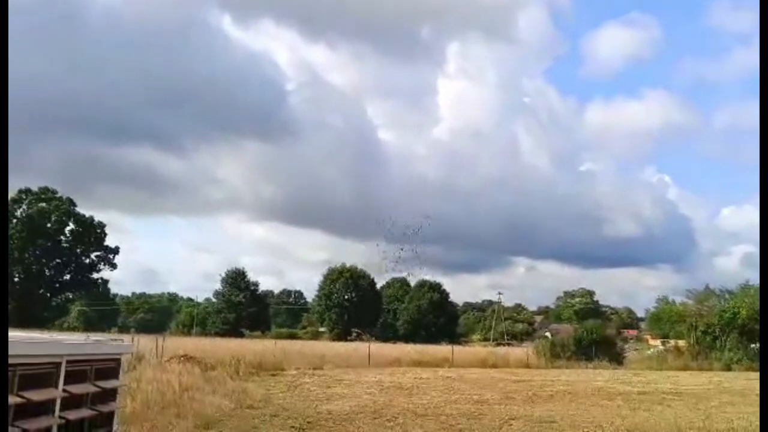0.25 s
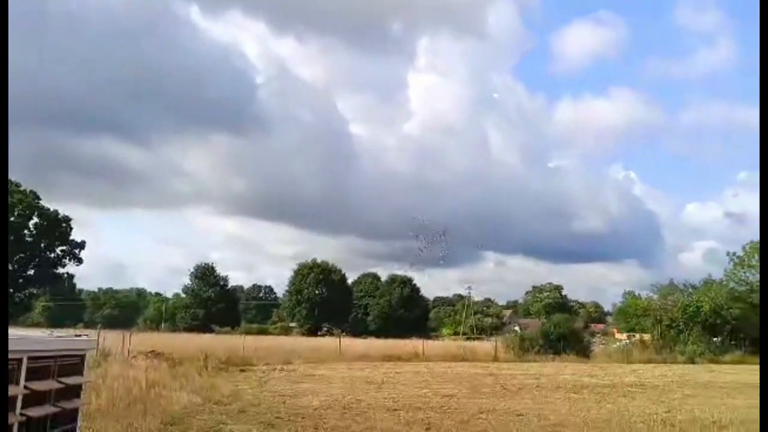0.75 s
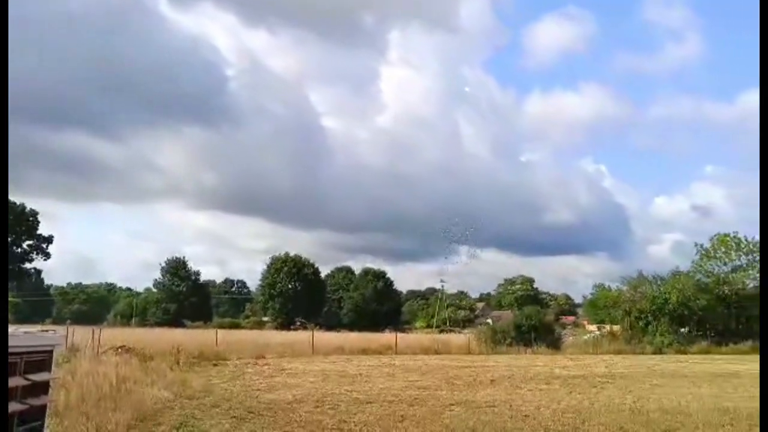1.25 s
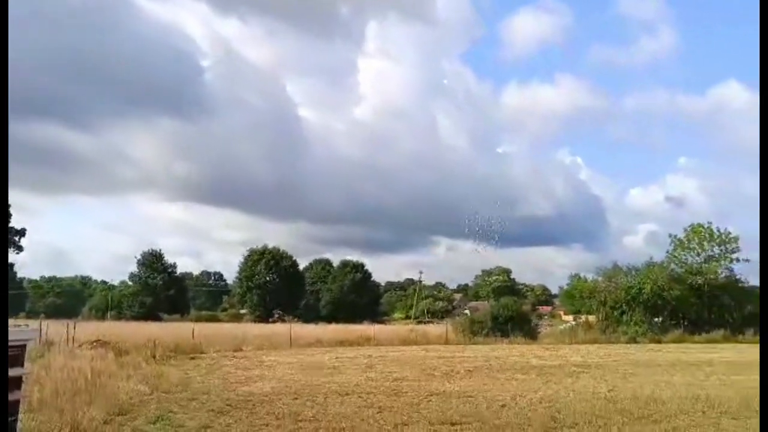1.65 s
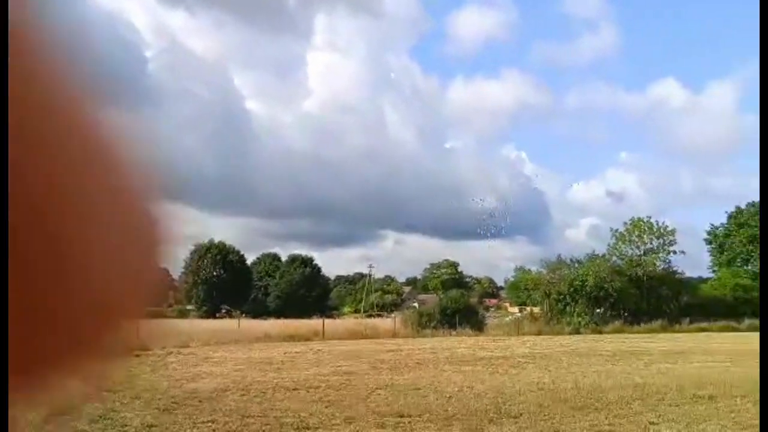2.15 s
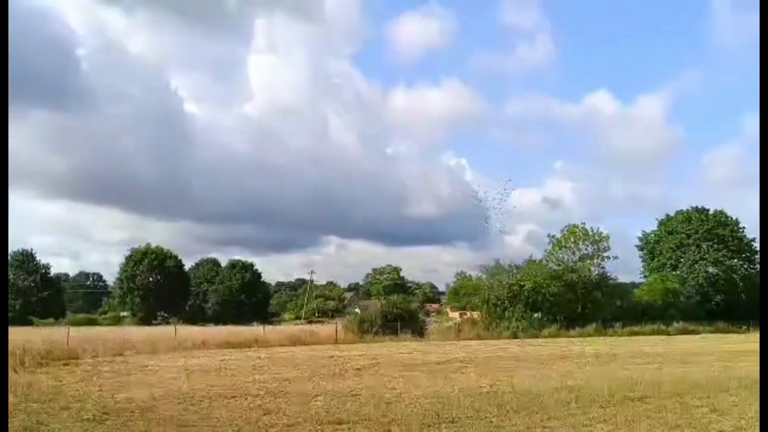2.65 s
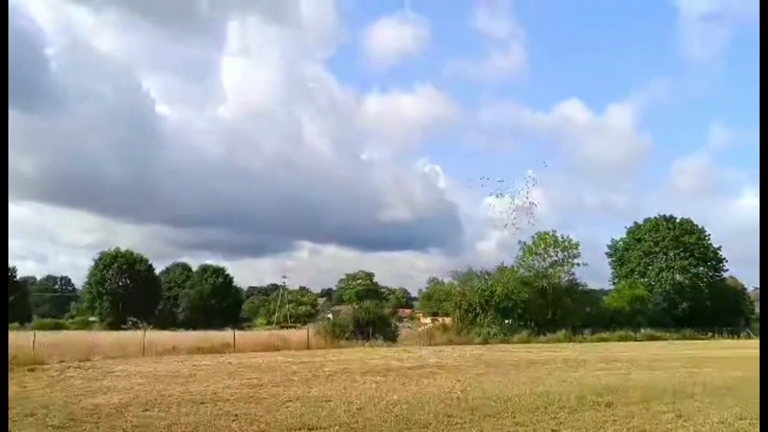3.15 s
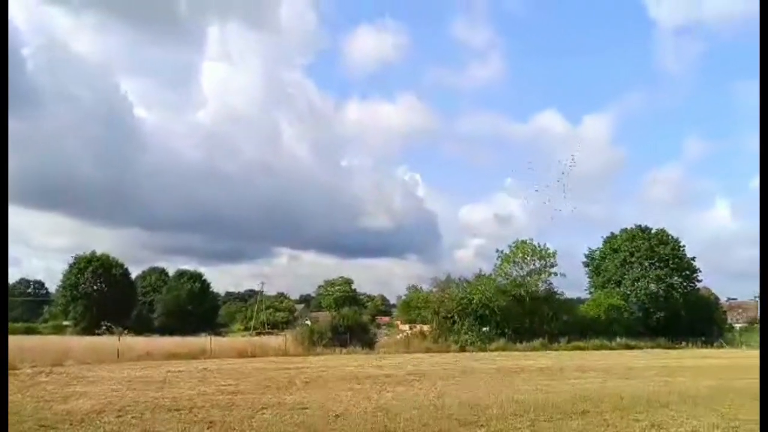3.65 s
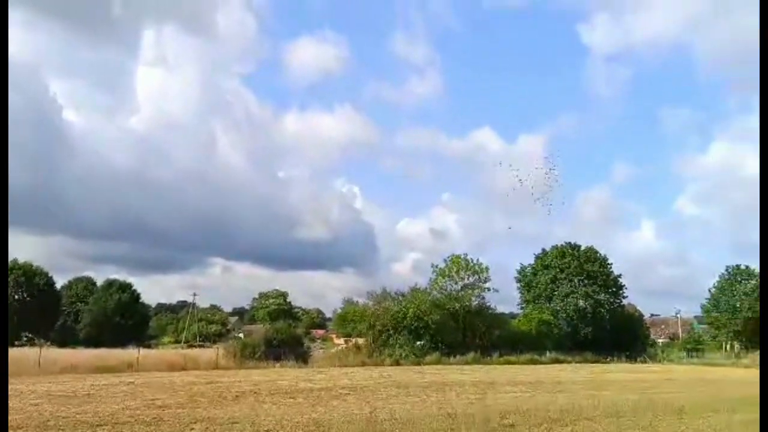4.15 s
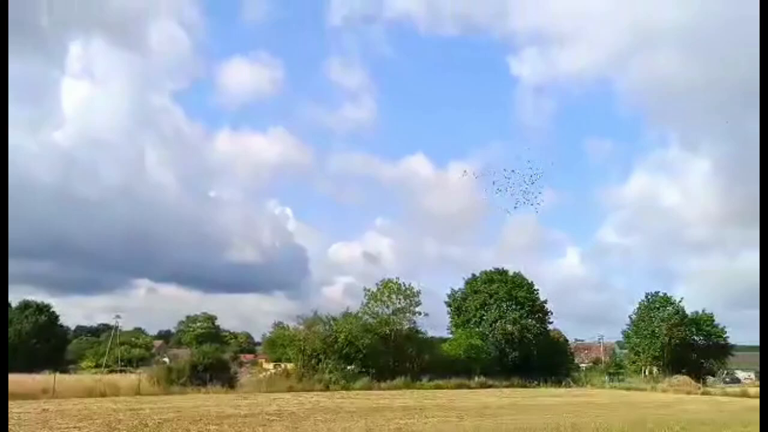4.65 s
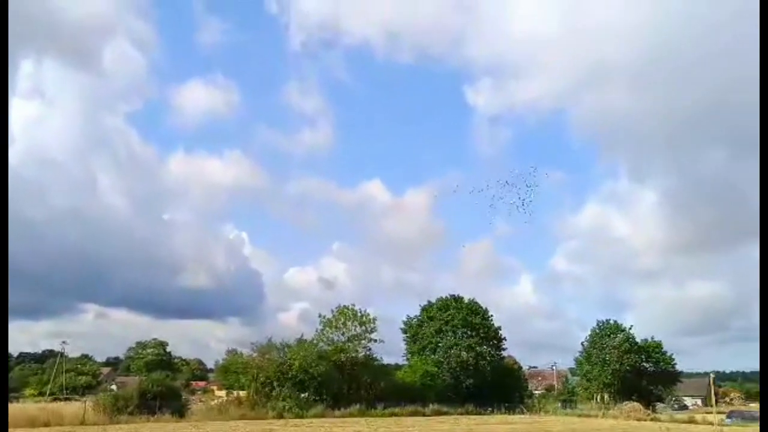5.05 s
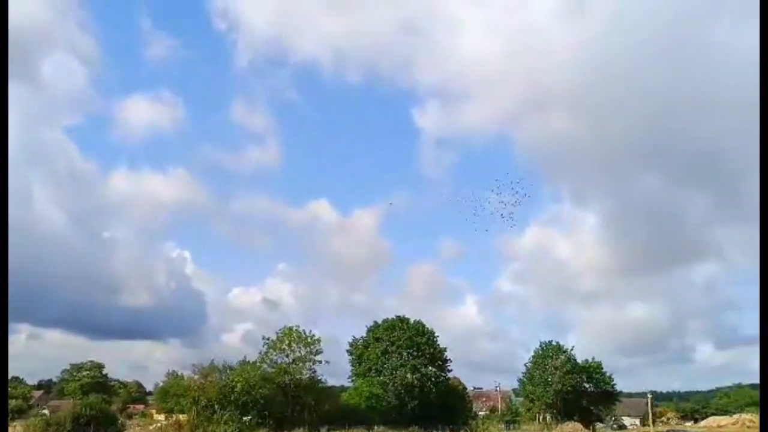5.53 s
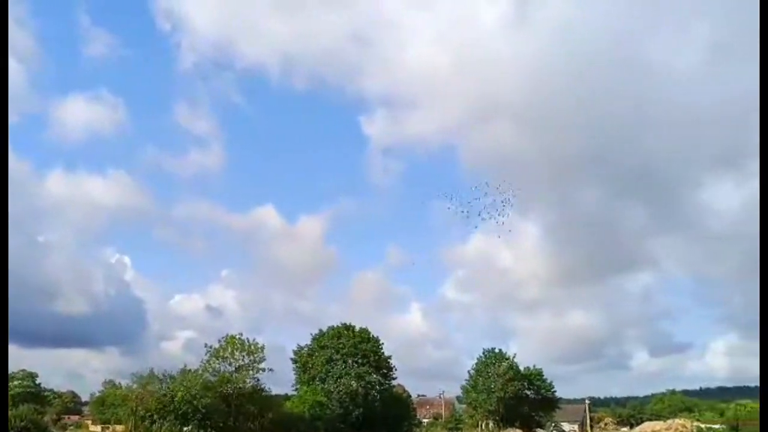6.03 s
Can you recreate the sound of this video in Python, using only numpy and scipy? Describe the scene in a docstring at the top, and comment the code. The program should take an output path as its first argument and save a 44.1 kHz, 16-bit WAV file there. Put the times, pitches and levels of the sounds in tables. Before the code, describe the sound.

Over the soft rustle of an open field, a nearby wooden crate is knocked shut, its slats rattling and a metal latch clinking. More thumps and sharp clicks follow while small birds cheep and whistle on the left. Near the end a pigeon struggles up and flaps away with crackling feathers and quick whooshes, as gusts of wind rumble and thud against the hand-held microphone.

```python
"""A wooden crate is knocked shut over the soft rustle of an open field. More knocks follow: panels
thump and ring, loose slats chatter, a latch clinks and fingers click. Small birds cheep and whistle
on the left. Near the end a pigeon struggles up and flaps off, pushing air through its feathers,
while gusts of wind rumble and thud against the two openings (ports) of a hand-held microphone."""
import sys
import numpy as np
from scipy import signal
from scipy.fft import rfft, irfft
from scipy.io import wavfile
from scipy.ndimage import uniform_filter1d

SR = 44100
rng = np.random.default_rng(int(sys.argv[2]) if len(sys.argv) > 2 else 0)


def generate_wav(signal):
    """Clip the signal to [-1, 1] and save it as 16-bit WAV at the path in sys.argv[1]."""
    frames = np.transpose(np.atleast_2d(signal))
    scaled = np.clip(frames, -1, 1) * 32767
    pcm = np.round(scaled).astype(np.int16)
    wavfile.write(sys.argv[1], SR, pcm)


N = 277389

# In the tables, pan is left minus right, and t60 is the time a sound takes to fade by 60 dB.
# how loud the leaves, grass and far bustle are: t/s, level/dB
FIELD_LEVELS = [(0.0, -53), (0.12, -49), (0.26, -48.5), (0.9, -57), (1.678, -54), (2.57, -54.5),
                (2.73, -57.5), (3.1, -49.5), (4.15, -57), (4.8, -52.5), (5.3, -49), (6.29, -51.5)]
# their tone colour: f/Hz, level/dB
FIELD_SPECTRUM = [(40, 10.5), (90, -2.5), (200, 3.5), (430, -2.5), (750, -3.5), (1250, -10), (1700, -5),
                  (2300, -10), (2900, -15), (4000, -13), (5500, -21.5), (8500, -21), (10500, -29),
                  (13500, -38.5)]
# how alike they sound on the left and right: f/Hz, likeness/0-1
FIELD_LIKENESS = [(100, 0.8), (400, 0.91), (1000, 0.4), (3000, 0.021), (8000, 0.13)]
# thin falling calls of far birds: t/s, length/s, first f/Hz, last f/Hz, level/dB,
# place of the loudest point/0-1, trill depth/0-1
CHEEP_NOTES = [(1.471, 0.17, 4640, 4270, -76.5, 0.3, .3), (1.769, 0.088, 4450, 3774, -64.5, 0.63, .05),
               (2.04, 0.19, 4550, 3910, -73, .4, 0.2), (3.585, 0.078, 4400, 3930, -71, 0.28, 0.27),
               (3.701, 0.19, 4560, 4270, -75.5, 0.6, .3), (3.986, 0.084, 4500, 3804, -69, 0.84, .05),
               (6.231, 0.052, 4060, 3700, -67, 0.48, .05)]
# hoarse rising squeaks: same columns as the cheeps
SQUEAK_NOTES = [(4.003, .06, 3130, 3250, -64, .3, .9), (4.97, 0.085, 2100, 2400, -59, 0.3, .05)]
# one bird's whistles, a list for each note: t/s, f/Hz, level/dB
WHISTLE_NOTES = [
    [(2.044, 2620, -61), (2.06, 2840, -57), (2.07, 2887, -51.5), (2.098, 2954, -48), (2.112, 2856, -67),
     (2.124, 2952, -46.5), (2.172, 3000, -67), (2.19, 2823, -77)],
    [(2.205, 2940, -75), (2.211, 2841, -68), (2.241, 2895, -50), (2.251, 2800, -52), (2.313, 2910, -66),
     (2.322, 2801, -77)],
    [(2.33, 2800, -72), (2.338, 2860, -48), (2.346, 2810, -41), (2.364, 2934, -49), (2.374, 2865, -36),
     (2.382, 2880, -53), (2.392, 2906, -36.5), (2.424, 2840, -60), (2.43, 2810, -53), (2.455, 2837, -59)],
    [(2.459, 2760, -65), (2.469, 2920, -48.5), (2.487, 2910, -44), (2.509, 2970, -53), (2.519, 2964, -44),
     (2.533, 2880, -49), (2.559, 2980, -48), (2.571, 2920, -66), (2.6, 2820, -67)],
    [(2.607, 2950, -52), (2.617, 2920, -53), (2.633, 2894, -46), (2.659, 2947, -50), (2.671, 2867, -40),
     (2.685, 2905, -54), (2.699, 2880, -45.5), (2.721, 2960, -63), (2.73, 3026, -72)],
    [(2.736, 2900, -65), (2.742, 2940, -54), (2.77, 2930, -60), (2.786, 2940, -50.5), (2.802, 2950, -61),
     (2.872, 2865, -65)],
    [(2.877, 2860, -66), (2.889, 2880, -54), (2.901, 2880, -63), (2.927, 2894, -46), (2.956, 2860, -53)],
]
# another bird's quick upward flicks, a list for each note: t/s, f/Hz, level/dB
FLICK_NOTES = [
    [(3.972, 2700, -83), (3.98, 2500, -58), (3.988, 2670, -45), (4.006, 2790, -67), (4.016, 2718, -57),
     (4.03, 2780, -72)],
    [(4.962, 1960, -60), (4.976, 2175, -51), (5.022, 2350, -53), (5.056, 2376, -54), (5.102, 2270, -67),
     (5.128, 2325, -62), (5.16, 2306, -64), (5.17, 2197, -71)],
]
# sharp snaps of a fingernail or catch: t/s, level/dB, pan/dB, f/Hz, t60/s
NAIL_SNAPS = [(1.789, -28.5, -17, 5530, .0012), (1.8374, -30.5, -16, 4420, 0.0031),
              (1.8704, -16, -28, 1860, 0.0022)]
# dry ticks of fingers, latches and wing tips: t/s, level/dB, pan/dB, treble against mids/dB, t60/s
DRY_TICKS = [(0.091, -35, -2, 13, .02), (0.164, -33, -3, -9, .03), (0.2, -43, -5, -5, .03),
             (0.5775, -41, -4, -3, .015), (0.806, -43, 0, 4, 0.034), (1.148, -45.5, 28, -7, 0.0066),
             (1.665, -38.5, -2, -0.5, 0.039), (1.815, -42, -6, -20, 0.096), (1.835, -41, 9, 19, 0.011),
             (2.122, -51, 5, -14, 0.0091), (2.63, -25, 7, -6, .015), (2.777, -45, 7, -14, .015),
             (2.961, -28.5, 4, -15, 0.023), (3.56, -40, 22, -6, 0.0082), (4.3729, -46.5, 20, -9, 0.018),
             (4.5506, -28, 5, 1, 0.028), (5.0127, -36, -2, -2, 0.023), (5.0513, -28, 25, 35, 0.0057),
             (5.058, -37, -13, 28, .008), (5.109, -39, 3, 19, 0.017), (5.2233, -29, 7, 10.5, 0.017),
             (5.232, -36.5, 4.5, 3, 0.044), (5.314, -43, 18, -10, .012), (5.37, -54, 5, 4, .012),
             (5.391, -45, -2, 14, .012), (5.427, -32, 8, 3, 0.012), (5.4803, -39, 18, -5, 0.015),
             (5.518, -51, 9, -14, .018), (5.527, -53, -8, -8, .016), (5.539, -40, 8, 13, 0.012),
             (5.593, -41, 18, -4, 0.022), (5.612, -47, -5, 1, .015), (5.631, -41, 0, 7, .012),
             (5.649, -40, 13, 10, 0.02), (5.698, -36.5, 0, 4, 0.018), (5.745, -37.5, 3, -1, 0.016),
             (5.761, -38, 11, 3, 0.015), (5.8118, -40, 21, 0, 0.011), (5.844, -45, 0, 4, .012),
             (5.855, -31, 18, -5, 0.018), (5.8736, -36, 4, 11, 0.02), (5.924, -48, 5, -3, .012),
             (5.949, -40, -3, -3, 0.017), (5.96, -39, 10, -4, .015), (5.975, -34, 3, -4, 0.017),
             (6.0405, -40, 4, -2, .012), (6.062, -42, 8, -4, 0.016), (6.088, -39, 3, -4, 0.016),
             (6.157, -52, 0, -5, .012), (6.193, -36, 4, -9, 0.017)]
# blows on the crates: t/s, rattle level/dB, thump level/dB, thump f/Hz, thump t60/s, treble/dB,
# rattle t60/s, crack against rattle/dB, share of ringing/0-1, panel pitch/ratio
CRATE_KNOCKS = [(0.093, -28.5, -39, 178.7, 0.24, -11, 0.14, 8, 0.79, 1.7),
                (.165, -38.5, -36, 207, 0.025, -25.5, 0.12, 7.5, 0.47, 0.94),
                (.182, -37.5, -28, 170, 0.036, -26, 0.35, -4, 0.7, 0.875),
                (1.173, -50, -33.5, 306, 0.02, -19, 0.7, -15, 0.85, 0.95),
                (1.458, -28.5, -21, 224, 0.035, -25.5, 0.051, -7, 0.59, 0.93),
                (1.659, -42, -25.5, 221.5, 0.049, -30.5, 0.19, -12, 0.38, .98),
                (1.86, -37, -31.5, 200, 0.041, -32, 0.063, -4, 0.55, .98),
                (2.628, -30.5, -33, 231.2, 0.14, -24.5, 1, 19, 0.9, 1.02),
                (2.707, -42, -34.5, 240, 0.037, -35, .12, 6, 0.86, 1),
                (2.899, -40.5, -40.5, 201, 0.1, -28, 0.14, 6, 0.41, 1.02),
                (2.951, -33, -38, 260, 0.037, -37, 0.54, 1.5, 0.69, 0.967),
                (2.99, -37.5, -45, 340, 0.042, -46, .3, 6, 0.82, .94),
                (3.048, -36, -53.5, 236, 0.21, -54, 0.55, 17, 0.92, 0.93),
                (4.736, -44, -46, 246, 0.05, -32, 0.077, 2, 0.7, 1.02),
                (4.754, -32.5, -61, 304, 0.055, -29, 0.052, 12.5, 0.7, 1.05),
                (4.779, -31.5, -58, 302, .05, -22, 0.35, 11, 0.9, 0.98)]
# the tones a crate's panels ring at: f/Hz, level/dB, t60/s
PANEL_MODES = [(476, -5.5, 0.039), (625, 1, 0.032), (775, 7, 0.025), (1240, -23, 0.0071),
               (1870, -4, 0.0055), (2376, -2, 0.0066), (3650, -12.5, 0.0075)]
# tone colour of loose slats at their brightest: f/Hz, level/dB
SLAT_SPECTRUM = [(250, -2.5), (400, -2), (790, 0.5), (1240, -3.5), (1880, 1), (2700, -14), (4000, 12.5),
                 (5500, 2.5), (8500, 3), (11000, -6.5), (13500, -44)]
# clinks of a metal latch: t/s, level/dB, t60/s
LATCH_CLINKS = [(0.0926, -40.5, 0.055), (0.5774, -33.5, 0.054), (0.611, -42, 0.057)]
# the tones the latch rings at: f/Hz, level/dB, t60/s
LATCH_MODES = [(1700, -10, .01), (2370, 4, .008), (3150, -3, .006), (3950, -2, .006), (4640, -8, .005),
               (5500, -8, .004), (7200, -14, .003)]
# how loud feathers and straw crackle: t/s, level/dB
CRACKLE_LEVELS = [(4.94, -72), (5.018, -49.5), (5.14, -54), (5.2, -98), (5.26, -57.5), (5.6, -62),
                  (6.29, -66)]
# the pigeon's downstrokes: t/s, level/dB, whoosh f/Hz
WING_STROKES = [(5.024, -45, 1990), (5.101, -51, 2000), (5.281, -41.5, 1680), (5.366, -40.5, 870),
                (5.468, -45, 750), (5.533, -43.5, 1700), (5.632, -42, 1230), (5.754, -41, 1200),
                (5.858, -39, 1440), (5.975, -37.5, 1320), (6.086, -41.5, 1390), (6.206, -43.5, 1150)]
# tone colour of air hissing through feathers: f/Hz, level/dB
FEATHER_SPECTRUM = [(400, -54), (800, 25.5), (1800, 17.5), (3500, 5), (6000, 0), (9000, 5.5), (12000, -11),
                    (13500, -40)]
# how loud the wind is at the ports: t/s, level/dB, pan/dB
WIND_LEVELS = [(0.0, -71, -9), (.18, -61, 3), (.35, -57, -16), (.5, -79, 12), (1.2, -88, 2), (2.27, -93, 5),
               (2.49, -43, -8), (2.6, -55, 1), (2.91, -52.5, 0), (3.1, -60.5, -5), (3.8, -63, 0),
               (4.1, -68, 16), (4.75, -44, 1.5), (4.87, -30.5, 4), (5.0, -45.5, -9), (5.14, -38, -0.5),
               (5.48, -60.5, 14), (5.628, -22, -56), (5.85, -39, -1), (6.01, -43.5, -11), (6.29, -49, 7)]
# tone colour of its rumble: f/Hz, level/dB
WIND_SPECTRUM = [(20, -40), (45, -38), (90, 0.5), (140, 2), (205, -6.5), (350, -17.5), (500, -37),
                 (900, -44), (1500, -77)]
# the strongest swirls of air, most hitting mainly one port: t/s, level/dB, pan/dB, f/Hz, length/s
WIND_SWIRLS = [(2.365, -41, -31, 123, 0.023), (2.431, -33, -29.0, 151, 0.019), (2.496, -29, 30, 217, 0.011),
               (2.533, -33, 27, 144.4, 0.048), (2.911, -28, -29, 185, 0.012), (3.043, -41, 9, 148, 0.0317),
               (3.828, -40.5, 26, 133, 0.038), (3.962, -33, 34, 130, 0.029), (4.267, -40, -14, 101, 0.022),
               (4.374, -43.5, -25, 94, 0.038), (4.583, -25.5, 4, 137, 0.028),
               (4.639, -33.5, 11, 132.5, 0.043), (4.663, -31, -82, 125, 0.02),
               (4.85, -19.5, -8, 174.4, 0.019), (4.862, -24, -11, 310, 0.014),
               (4.908, -19.5, 44, 148, 0.031), (5.138, -29, -25, 147, 0.019), (5.224, -35, 24, 135, 0.024),
               (5.556, -27.5, -24, 129, 0.0072), (5.617, -18, -49, 194, 0.035),
               (5.631, -20, -44, 285, 0.01164), (5.693, -27.5, -5, 178.6, 0.041),
               (5.712, -25, -33, 158, 0.016), (5.743, -20.5, -22, 149, 0.021),
               (5.795, -26, -37, 153, 0.017), (5.818, -27.5, 2, 138, 0.027), (5.922, -30, -5, 108, 0.018),
               (5.99, -26.5, -39, 159, 0.041), (6.045, -18, -38, 154, 0.012),
               (6.196, -33.5, -29, 128, 0.024)]


def gain_of(db):
    """Turns decibels into a number to multiply by."""
    return 10 ** (np.asarray(db) / 20)


def fade(t, t60):
    """Starts at 1 and drops by 60 dB every t60 seconds."""
    return gain_of(-60 * t / t60)


def evened(x):
    """Scales a signal to an average strength (rms) of 1."""
    return x / np.sqrt(np.mean(x ** 2) + 1e-20)


def wander(size, span):
    """A smooth random curve: noise averaged twice over span samples."""
    return evened(uniform_filter1d(uniform_filter1d(rng.standard_normal(size), span), span))


def look_up(points, hz):
    """Reads between the rows of a table, on a logarithmic frequency scale."""
    f, value = np.transpose(points)
    return np.interp(np.log(hz + 1), np.log(f + 1), value)


def coloured(spectrum, size):
    """Noise of strength 1 with the given tone colour."""
    hz = np.fft.rfftfreq(size, 1 / SR)
    return evened(irfft(rfft(rng.standard_normal(size)) * gain_of(look_up(spectrum, hz)), size))


def add(mix, s, sound, pan_db=0., lag=0):
    """Adds a sound at s seconds; it reaches the right port lag samples later than the left."""
    for side, start in ((1, round(s * SR)), (-1, round(s * SR) + lag)):
        part = mix[(1 - side) // 2, start:][:len(sound)]
        part += 2 / (1 + gain_of(-side * pan_db)) * sound[:len(part)]


def resonate(x, hz, width_hz):
    """Keeps a band around hz, which may glide: shifts it down to zero, smooths, and shifts back."""
    turn = np.exp(2j * np.pi * np.cumsum(hz * np.ones(len(x))) / SR)
    memory = np.exp(-np.pi * width_hz / SR)
    return 2 * (turn * signal.lfilter([1 - memory], [1, -memory], x / turn + 1e-18)).real


def steep_band(x, hz, width_hz):
    """The same resonance twice, so less gets through on either side."""
    return resonate(resonate(x, hz, width_hz), hz, width_hz)


def ring(modes, blow):
    """A struck object rings at its own tones, tuned a little differently each time; peak 1."""
    out = 0
    for (hz, db, t60), detune in zip(modes, rng.uniform(0.97, 1.02, len(modes))):
        width_hz = np.log(1000) / np.pi / t60
        out = out + gain_of(db) * np.sqrt(t60) * steep_band(blow, hz * detune, width_hz)
    return out / abs(out).max()


def echoes(x, t60):
    """Scattered, slightly dull echoes from a trailer, hedges and houses."""
    t, out = np.arange(SR) / SR, []
    for _ in range(2):
        bounces = rng.standard_normal(SR) * (rng.random(SR) < .05)
        bounces *= fade(t, t60) * np.minimum(t / 0.0012, 1)
        dull = signal.lfilter([1], [1, -.45], bounces)
        out.append(gain_of(-6.5) * signal.fftconvolve(x, dull / np.linalg.norm(dull))[:N])
    return np.array(out)


def field():
    """Leaves, grass and far bustle blur into noise with drifting louder and softer patches."""
    frames, hz = N // 128 + 5, np.fft.rfftfreq(512, 1 / SR)
    a, b, c, d, patches = rng.standard_normal((frames, 257, 5)).T
    left, unrelated = a + 1j * b, c + 1j * d  # two random spectra for every short moment
    patches = evened(uniform_filter1d(uniform_filter1d(patches, 8, 0), 20, 1))
    flicker = evened(uniform_filter1d(rng.standard_normal(frames), 3))
    alike = look_up(FIELD_LIKENESS, hz)[:, None]
    delay = np.exp(-2j * np.pi * hz * 16 / SR)[:, None]  # 16 samples
    right = alike * delay * left + np.sqrt(1 - alike ** 2) * unrelated
    colour = gain_of(look_up(FIELD_SPECTRUM, hz)[:, None] + 1.9 * patches + 1.5 * flicker)
    rustle = signal.istft(np.array([left, right]) * colour, nperseg=512, noverlap=384)[1][:, :N]
    s, level_db = np.transpose(FIELD_LEVELS)
    return gain_of(np.interp(np.arange(N) / SR, s, level_db)) * evened(rustle)


def drone():
    """A faint, fuzzy drone swells and fades for a quarter of a second after the latch clinks."""
    out, size = np.zeros((2, N)), round(.25 * SR)
    fuzz = evened(steep_band(rng.standard_normal(size), hz=1700, width_hz=260))
    add(out, .63, gain_of(-61) * signal.windows.tukey(size, .5) * fuzz, pan_db=7, lag=10)
    return out


def bird_call(length, first_hz, last_hz, level_db, peak, trill,
              slide_s, start_db, end_db, waver_db, hoarse):
    """A breathy tone that slides in pitch, swells, trembles and fades."""
    sag, wobble, trill_hz = 0.048, .006, 50
    t = np.arange(0, length, 1 / SR)
    slide = (np.exp(-t / slide_s) - np.exp(-length / slide_s)) / (1 - np.exp(-length / slide_s))
    hz = last_hz + (first_hz - last_hz) * slide
    hz *= 1 - sag * (t / length) ** 3  # the pitch droops as the breath runs out
    hz *= 1 + wobble * wander(len(t), 600)
    swell = gain_of(level_db + np.interp(t / length, [0, peak, 1], [start_db, 0, end_db]))
    tremble = gain_of(waver_db * wander(len(t), 200))
    trill_depth = trill * np.minimum(t / 0.07, 1)
    tremble *= 1 + trill_depth * np.cos(2 * np.pi * trill_hz * (t - peak * length))
    breath = evened(resonate(resonate(rng.standard_normal(len(t)), hz, 180), hz, 160))
    tone = np.sqrt(2) * np.sin(2 * np.pi * np.cumsum(hz) / SR) + hoarse * breath
    return swell * tremble * tone * signal.windows.tukey(len(t), .1)


def far_birds():
    """Birds cheep and squeak on the left, and close echoes mingle with their calls."""
    out = np.zeros((2, N))
    for s, length, *shape in CHEEP_NOTES:
        slide_s = 0.0202 + 8.41 * max(length - .1, 0)  # long cheeps slide more slowly
        cheep = bird_call(length, *shape, slide_s, start_db=-8, end_db=-19, waver_db=5, hoarse=0.36)
        add(out, s, cheep, pan_db=29, lag=5)
    for s, *shape in SQUEAK_NOTES:
        squeak = bird_call(*shape, slide_s=0.038, start_db=-15, end_db=-33, waver_db=4, hoarse=0.66)
        add(out, s, squeak, pan_db=15, lag=10)
    return out + gain_of(1) * echoes(out[0], t60=.11)


def whistling_birds():
    """Two birds on the left sing pure notes that bend and throb."""
    out = np.zeros((2, N))
    for note in WHISTLE_NOTES + FLICK_NOTES:
        s, hz, level_db = np.transpose(note)
        t = np.arange(s[0], s[-1], 1 / SR)
        pitch = uniform_filter1d(np.interp(t, s, hz), 300, mode="nearest")
        swell = uniform_filter1d(uniform_filter1d(gain_of(np.interp(t, s, level_db)), 80), 80)
        tone = np.sqrt(2) * np.sin(2 * np.pi * np.cumsum(pitch) / SR)
        add(out, s[0], swell * tone * signal.windows.tukey(len(t), .1), pan_db=15, lag=-5)
    return out + gain_of(-9) * echoes(out[0], t60=.11)


def snaps():
    """A fingernail or catch snaps: a tone that dies almost at once, with a little fizz behind it."""
    out, t = np.zeros((2, N)), np.arange(1000) / SR
    for s, level_db, pan_db, hz, t60 in NAIL_SNAPS:
        click = fade(t, t60) * np.cos(2 * np.pi * hz * t)
        fizz = gain_of(-22) * fade(t, 0.012) * evened(resonate(rng.standard_normal(len(t)), hz, hz))
        add(out, s, gain_of(level_db) * (click + fizz), pan_db, lag=14)
    return out


def ticks():
    """Fingers, latches and wing tips tick: each a short burst of noise with a faint, slower tail."""
    out, t = np.zeros((2, N)), np.arange(2000) / SR
    for s, level_db, pan_db, treble_db, t60 in DRY_TICKS:
        colour = [(300, -23), (800, -2), (1700, 15.5), (3000, 2.5),
                  (7000, treble_db - 2.5), (12500, treble_db - 16.5)]
        tail = gain_of(-18) * fade(t, 11 * t60)
        burst = coloured(colour, len(t)) * np.minimum(t / .0005, 1) * (fade(t, t60) + tail)
        add(out, s, gain_of(level_db) * burst / abs(burst).max(), pan_db, lag=14)
    return out


def knock(rattle_db, thump_db, thump_hz, thump_t60, treble_db, t60, crack_db, ringing, pitch):
    """A blow cracks and thumps a crate, which bounces once; its slats chatter and its panels ring."""
    t = np.arange(SR // 2) / SR
    since_bounce = np.maximum(t - 0.025, 0)
    uneven_db = 1.6 * evened(uniform_filter1d(rng.standard_normal(len(t)), 250))
    clacks = signal.lfilter([1], [1, -.99], rng.random(len(t)) < 150 / SR)  # about 150 a second
    chatter = gain_of(uneven_db) * fade(t, t60) * (1 + 2.5 * clacks)
    crack = gain_of(crack_db) * fade(t, 0.075)
    force = np.minimum(t / 0.00026, 1) * (0.68 * chatter + crack)
    force += (since_bounce > 0) * gain_of(-9) * fade(since_bounce, 0.082)  # the bounce cracks too
    colour = [(hz, db + treble_db * np.clip(np.log2(hz / 2500), 0, 1)) for hz, db in SLAT_SPECTRUM]
    slats = force * coloured(colour, len(t)) / 1.03
    panels = ring(np.multiply(PANEL_MODES, (pitch, 1, 1)), force * rng.standard_normal(len(t)))
    rattle = (1 - ringing) * slats + ringing * panels
    thump = np.minimum(t / 0.0014, 1) * fade(t, thump_t60) * np.sin(2 * np.pi * thump_hz * t)
    bounce = np.sin(2 * np.pi * 1.227 * thump_hz * since_bounce)
    bounce *= gain_of(-3) * np.minimum(since_bounce / 0.0054, 1) * fade(since_bounce, 1.58 * thump_t60)
    return gain_of(rattle_db) * rattle + gain_of(thump_db) * (thump + bounce)


def crates():
    """Crates are knocked and shut nearby, a metal latch jingles on the left, and both echo."""
    out, t = np.zeros((2, N)), np.arange(SR // 2) / SR
    for s, *blow in CRATE_KNOCKS:
        add(out, s, knock(*blow), pan_db=-1, lag=16)
    for s, level_db, t60 in LATCH_CLINKS:
        jingle = ring(LATCH_MODES, rng.standard_normal(len(t)) * fade(t, t60))
        add(out, s, gain_of(level_db) * jingle, pan_db=21, lag=3)
    return out + echoes(out[0], t60=0.37)


def pigeon_crackle():
    """Feathers and straw make many tiny, bright snaps as the pigeon struggles up."""
    s, level_db = np.transpose(CRACKLE_LEVELS)
    sizes = gain_of(3.1 * np.minimum(rng.exponential(1, (3, N)), 5))
    signs = rng.choice([-1., 1.], (3, N))
    shared, left, right = sizes * signs * (rng.random((3, N)) < 350 / SR)  # each about 350 a second
    ports = [shared + .7 * left, np.roll(shared, 18) + .7 * right]
    bright = np.array([resonate(p, 3500, 3200) + resonate(resonate(p, 1900, 900), 1600, 900)
                       for p in ports])
    return gain_of(np.interp(np.arange(N) / SR, s, level_db, left=-200)) * evened(bright)


def pigeon_wings():
    """Each downstroke pushes air through the feathers: a hiss and a rising, fuzzy whoosh."""
    stroke_s, whoosh_share = 0.063, 0.47
    out, progress = np.zeros((2, N)), np.linspace(0, 1, round(stroke_s * SR))
    swell = np.sin(np.pi * progress) ** 2.1
    for s, level_db, hz in WING_STROKES:
        rising_hz = hz * (0.737 + 0.43 * progress)
        whoosh = evened(steep_band(rng.standard_normal(len(progress)), rising_hz, .22 * hz))
        hiss = coloured(FEATHER_SPECTRUM, len(progress))
        air = (1 - whoosh_share) * hiss + whoosh_share * whoosh
        add(out, s - stroke_s / 2, gain_of(level_db) * swell * air, pan_db=-1, lag=18)
    return out


def wind():
    """Rough air rumbles at each port separately, and strong swirls shake the microphone's membrane."""
    s, level_db, pan_db = np.transpose(WIND_LEVELS)
    t, out = np.arange(N) / SR, np.zeros((2, N))
    for port, side in enumerate((1, -1)):
        lumps = gain_of(5.5 * wander(N, 500))
        rumble = evened(lumps * coloured(WIND_SPECTRUM, N))
        share = np.sqrt(4 / (1 + gain_of(-2 * side * np.interp(t, s, pan_db))))
        out[port] = gain_of(np.interp(t, s, level_db)) * share * rumble
    for s, level_db, pan_db, hz, length in WIND_SWIRLS:
        phase, drift_phase = rng.random(2)
        progress = np.linspace(0, 1, round(length * SR))
        drift = 0.041 * np.sin(2 * np.pi * (1.47 * progress + drift_phase))  # speeds up and slows down
        turns = hz * length * (progress + drift) + phase
        swing = np.sin(2 * np.pi * turns) + 0.093 * np.sin(4 * np.pi * turns)  # a lopsided swing
        swell = np.sin(np.pi * progress) ** 0.77
        add(out, s - length / 2, gain_of(level_db) * swell * swing, pan_db)
    return out


def scene():
    """Adds up all the sounds at the left and right ports."""
    return (field() + wind() + crates() + drone() + ticks() + snaps()
            + pigeon_wings() + pigeon_crackle() + far_birds() + whistling_birds())


def record(dry):
    """The microphone squashes the strongest gusts and loses the deepest bass and highest treble."""
    ceiling, lowest_hz, highest_hz = .3, 70, 13500
    squashed = ceiling * np.tanh(dry / ceiling)
    thinned = signal.sosfilt(signal.butter(3, lowest_hz, "high", fs=SR, output="sos"), squashed)
    treble_cut = signal.firwin(511, highest_hz, window=("kaiser", 9), fs=SR)
    return signal.oaconvolve(thinned, treble_cut[None], "same")


dry = scene()
out = record(dry)
generate_wav(out)
```